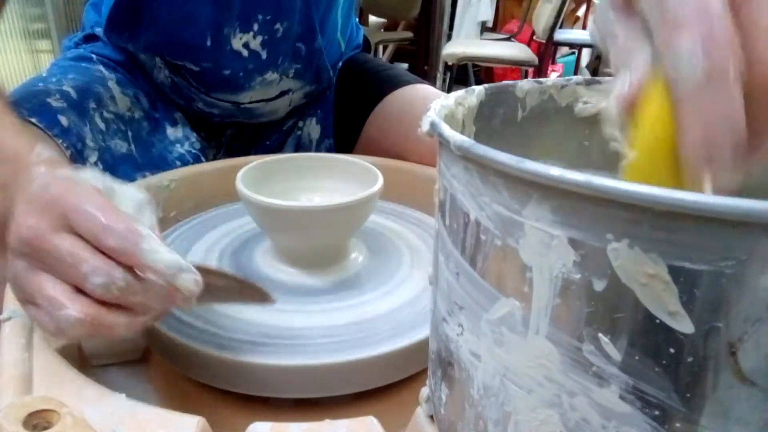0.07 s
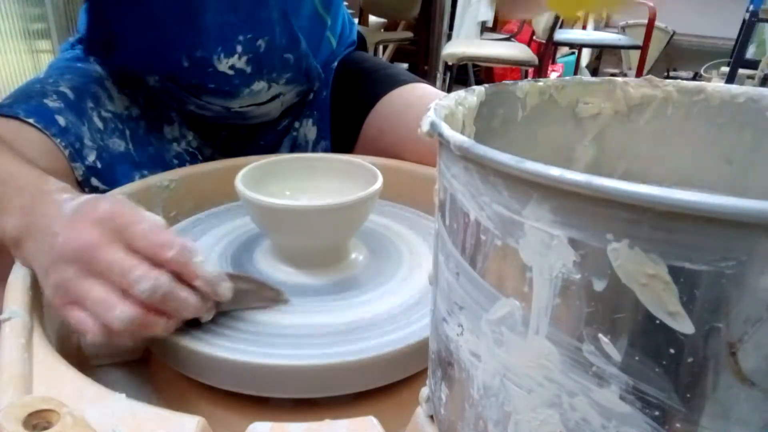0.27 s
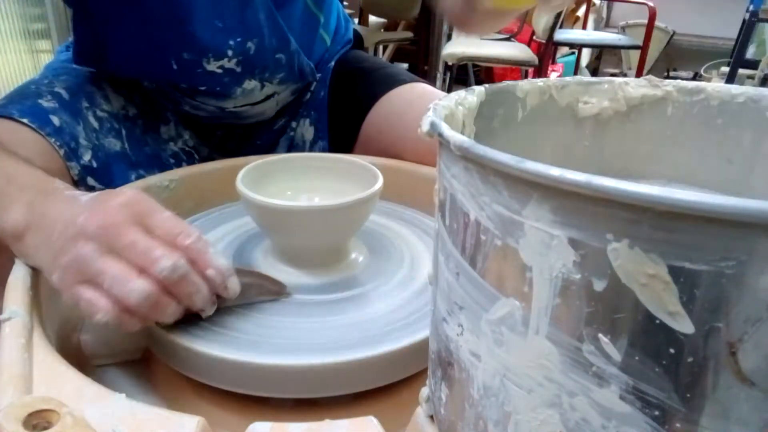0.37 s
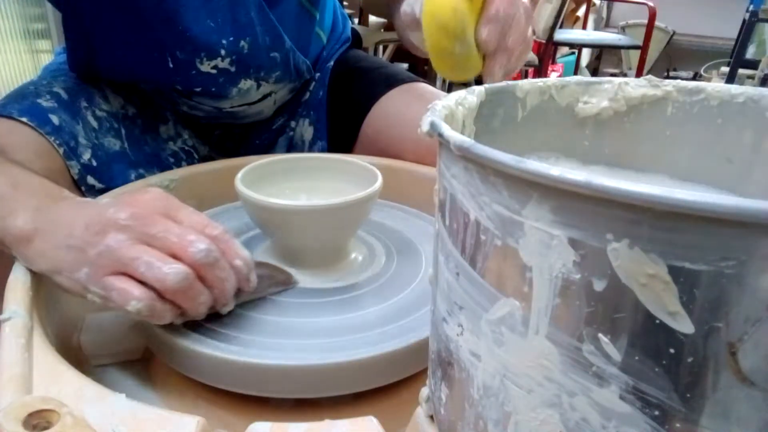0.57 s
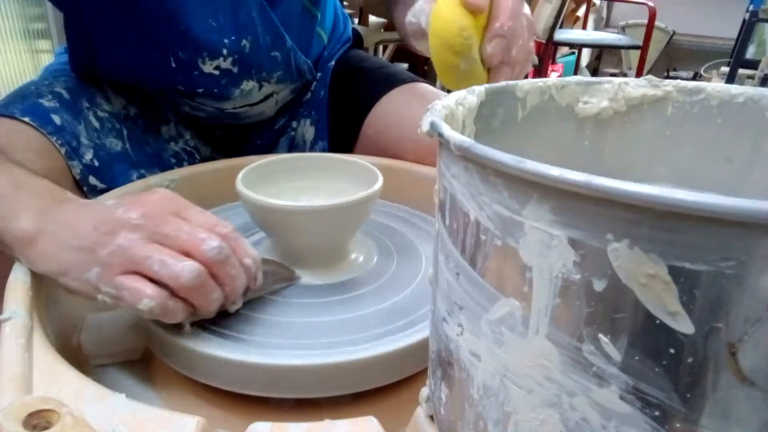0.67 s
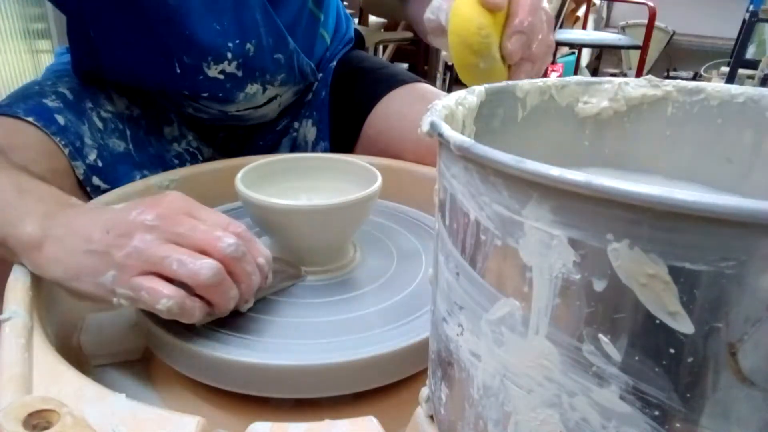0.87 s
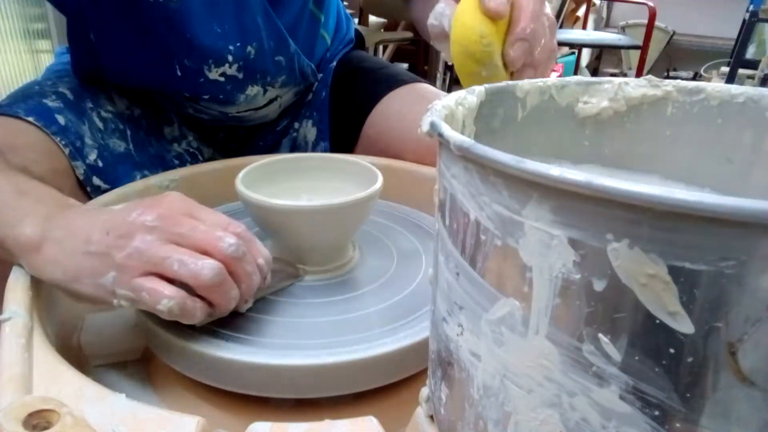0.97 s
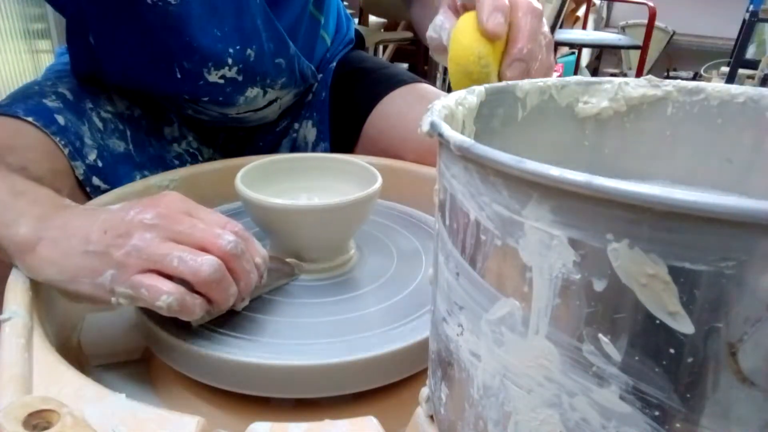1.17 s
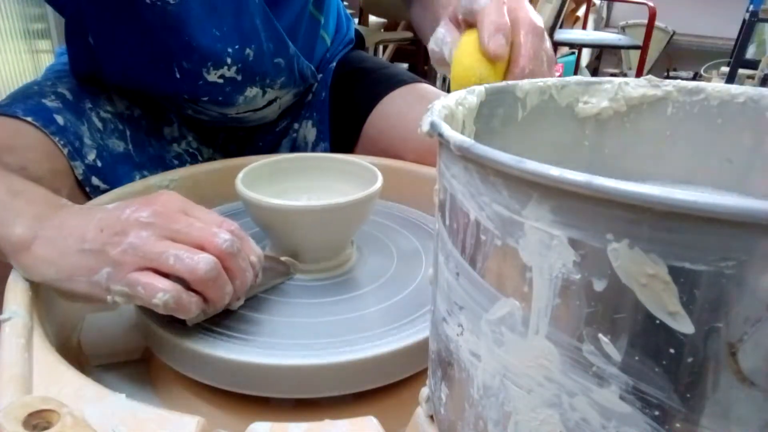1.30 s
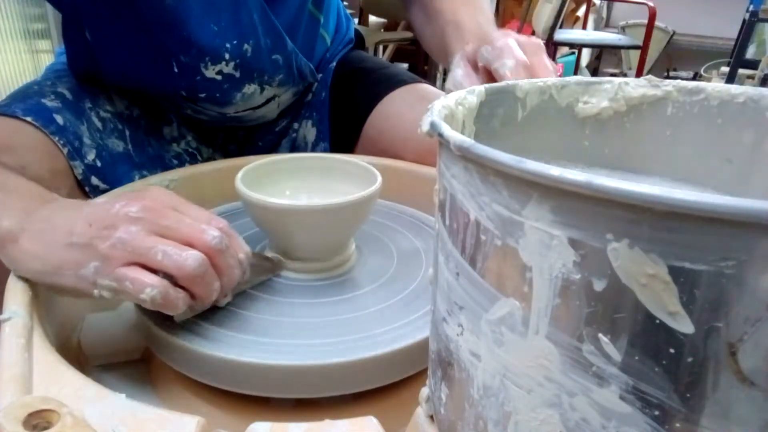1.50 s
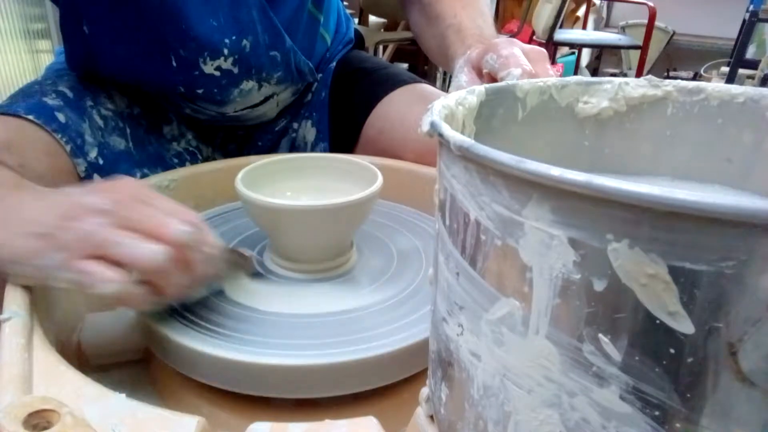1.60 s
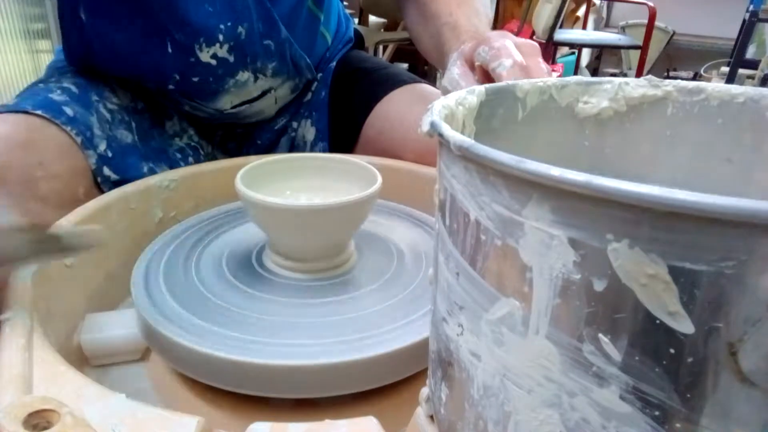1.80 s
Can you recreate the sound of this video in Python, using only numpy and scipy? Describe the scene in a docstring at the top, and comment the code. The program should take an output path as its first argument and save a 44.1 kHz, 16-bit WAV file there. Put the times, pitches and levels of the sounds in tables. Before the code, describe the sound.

A gritty, hissing scrape of a wooden tool on a turning potter's wheel, heard up close in a studio. It squeaks early and again near the end, after a distant knock, leaving a short metallic ring. The motor hums faintly.

```python
"""In a pottery studio, close by, a wooden tool scrapes wet clay off the head of a spinning wheel.
Sliding friction on grit makes a hiss. Where the blade meets bare metal it squeals by stick-slip and
drives the head's normal modes, which ring on after the tool lifts. Further off, something is put down
with a dull knock. The wheel's motor hums throughout."""
import sys
import numpy as np
from scipy.fft import rfft, irfft, next_fast_len
from scipy.io import wavfile
from scipy.ndimage import uniform_filter1d, map_coordinates

SR = 44100
rng = np.random.default_rng(int(sys.argv[2]) if len(sys.argv) > 2 else 0)


def file_out(sig):
    """Save sig as 16-bit WAV at sys.argv[1]."""
    # one column per channel
    cols = np.atleast_2d(sig).T
    # limit, then scale
    lim = np.clip(cols, -1, 1)
    pcm = np.round(lim * 32767).astype(np.int16)
    wavfile.write(sys.argv[1], SR, pcm)


N = 81585
TIME = np.arange(N) / SR

# correlation between the ears (f/Hz, coefficient)
COHERENCE = [(60, 0.8), (250, 0.6), (1000, 0.41), (2500, 0.19), (6000, 0.08), (15000, 0.033)]
# spectra of the room air, the drive's rumble and the running wheel (f/Hz, gain/dB)
AIR_SPECTRUM = [(59, -27), (100, 0), (140, -7.5), (188, -3), (228, -11), (477, -10.5), (530, -15),
                (917, -14), (1160, -22.5), (3180, -20), (3460, -20.5), (6660, -28), (8410, -37),
                (15500, -38.5)]
RUMBLE_SPECTRUM = [(20, -5), (35, -13), (50, 3), (85, 0.5), (120, -14), (250, -39), (1000, -70)]
WHEEL_SPECTRUM = [(1500, -19), (2600, -15), (3100, 0), (3700, -2), (4300, -15), (6500, -6.5), (9000, -21),
                  (15000, -18)]
# envelopes of the motor's hum and the wheel's hiss (t/s, relative level/dB)
HUM_ENVELOPE = [(0.0, -65), (0.35, -53), (0.458, -78), (0.694, -81), (0.73, -70), (1.154, -51.5),
                (1.2, -73), (1.236, -57), (1.36, -87), (1.432, -54), (1.596, -50.5), (1.658, -88),
                (1.726, -47.5), (1.85, -59)]
WHEEL_ENVELOPE = [(0, -73.5), (1.5, -69), (1.7, -66), (1.85, -65)]
# motor overtones (f/Hz, level/dB)
OVERTONES = [(116, -85), (182, -81)]
# impacts of the knock (t/s, clack level/dB, clack T60/s)
IMPACTS = [(1.1463, -30.5, .09), (1.159, -36, 0.088), (1.177, -43.5, 0.31)]
# spectra of the knock's bright and dull parts (f/Hz, gain/dB)
CLACK_SPECTRUM = [(100, -16), (500, -9), (900, 0.5), (1200, -4.5), (1600, -5), (2800, 0.5), (3500, 8),
                  (4300, 0), (6000, -30), (14000, -35)]
THUD_SPECTRUM = [(30, -20), (80, 14.5), (120, -12), (190, 7.5), (320, 5), (450, -3), (700, 4), (1500, -2),
                 (4000, -18)]
# squeals of the blade (t/s, duration/s, f/Hz, glide/(Hz/s), jitter/Hz, level/dB)
STICK_SLIPS = [(.33, 0.087, 1740, -1, 110, -45.5), (0.28, 0.26, 5780, -4, 100, -46),
               (0.43, 0.14, 5720, -1500, 55, -43.5), (1.36, 0.039, 1800, -1, 25.3, -42.5),
               (1.41, 0.041, 1795, 1, 40.2, -47.5), (1.37, 0.093, 2940, 0.5, 51.8, -45)]
# drive of the blade on bare metal (t/s, level/dB)
DRIVE_ENVELOPE = [(.125, -97), (.16, -60.5), (.23, -53.5), (.35, -51.5), (.43, -49.5), (.52, -54.5),
                  (.62, -59.5), (.95, -58), (1.1, -63), (1.28, -59.5), (1.38, -54), (1.44, -53),
                  (1.485, -52.5), (1.53, -61.5), (1.6, -82)]
# low drag of the blade on the head (f/Hz, gain/dB)
DRAG_SPECTRUM = [(30, -15), (70, -7), (200, -5), (450, -9.5), (1200, 0.5), (3000, -44)]
# head modes, damped by hand and clay (f/Hz, width/Hz, gain far out/dB, gain at the pot's foot/dB)
HEAD_MODES = [(628.5, 33, -12.5, -19.5), (878.5, 31.5, -6.5, -1.5), (918, 17.6, -1, -3),
              (1388, 52, -18, -3), (1787, 26.3, -3.5, 0.5), (2918, 26, 1.5, 4), (3052, 22, 3, -28),
              (3310, 26, -1.5, -4), (3534, 17, -31, 3.5), (4220, 39, -8.5, 2.5), (4674, 44, -19, 6),
              (4970, 41, -3, 5.5), (5785, 82, -20, 6.5), (6570, 50, -12, -22)]
# modes ringing freely as the blade lifts (f/Hz, level/dB, T60/s)
FREE_MODES = [(3047, -66, 0.13), (3330, -53, .12), (4750, -55, .11), (4920, -49, 0.17)]
# a low mode singing clean as the hand eases off (t/s, f/Hz, level/dB)
SINGING_MODE = [(1.27, 880.5, -77), (1.34, 880, -61), (1.44, 882, -52.5), (1.511, 922, -47),
                (1.55, 928, -57.5), (1.68, 931, -65), (1.85, 937, -87)]
# envelopes of the blade's hiss and rasp on clay (t/s, relative level/dB)
HISS_ENVELOPE = [(0.14, -81), (0.148, -62.5), (0.35, -37.5), (0.398, -43), (0.406, -36.5), (0.518, -40.5),
                 (0.564, -37.5), (0.666, -36.5), (0.68, -33.5), (0.77, -38), (0.824, -36), (1.038, -36),
                 (1.264, -40), (1.434, -36.5), (1.45, -43), (1.466, -38.5), (1.62, -76)]
RASP_ENVELOPE = [(.14, -85), (.24, -64), (.34, -59), (.52, -56), (.7, -52.5), (.78, -57), (1.0, -57.5),
                 (1.13, -55.5), (1.3, -55), (1.42, -57), (1.49, -63.5), (1.55, -84)]
# coarse grit catching under the blade (t/s, level/dB, T60/s)
GRIT_CATCHES = [(0.146, -50, 0.048), (.291, -35, .06), (0.405, -33, .08), (0.565, -42, 0.011),
                (.681, -39, .03), (.733, -35, .012)]
# spectra of the scrape's three bands (f/Hz, gain/dB)
RASP_SPECTRUM = [(100, -18), (500, -22.5), (1050, -15.5), (1400, -2), (2450, 2.5), (2740, -0.5), (2950, -5),
                 (4500, -2), (9000, -39)]
HISS_SPECTRUM = [(300, -68), (1200, -19), (2500, -12), (2750, -11), (2950, -3), (3800, -6), (4450, -9),
                 (4750, -5), (5650, 0.5), (7000, -4), (8000, -10), (10000, -11), (13500, -17), (14300, -9),
                 (15500, -10.5)]
FIZZ_SPECTRUM = [(9000, -43), (13800, -15), (14700, -6.5), (15300, 2), (15600, -6.5)]
# reflections off the splash pan and the bucket (delay/s, gain/dB)
ECHOES = [(.0019, -26), (.0034, -11), (.0057, -13), (.0083, -16.5), (0.0126, -14.5), (.019, -17.5)]
# level difference of the tool's sound between the ears (f/Hz, left minus right/dB)
BALANCE = [(200, 5), (770, 3), (1170, -0.5), (1790, 3.5), (2740, -2.5), (4190, -3.5), (6410, -8.5),
           (9810, 0), (15000, 0.5)]


def amp(db):
    """Amplitude ratio of a level in decibels."""
    return 10 ** (np.asarray(db) / 20)


def along(points, hz):
    """Interpolation of (f/Hz, value) points on a logarithmic frequency axis."""
    f, values = np.transpose(points)
    return np.interp(np.log(hz + 1), np.log(f + 1), values)


def envelope(points):
    """Linear interpolation of (t/s, level/dB) points, silent outside them."""
    return np.interp(TIME, *np.transpose(points), left=-120, right=-120)


def wobble(rate):
    """Smooth random modulation: a spline through rate Gaussian knots a second."""
    return map_coordinates(rng.standard_normal(N // 8), [np.arange(N) * rate / SR + 2])


def flutter(rate):
    """Random modulation held within +-1 by soft saturation."""
    return np.tanh(wobble(rate))


def strike(start, t60, attack_s):
    """Envelope of a damped vibration: a quick rise, then exponential decay."""
    age = np.maximum(TIME - start, 0)
    return (1 - np.exp(-age / attack_s)) * np.exp(-np.log(1000) * age / t60)


def filtered(x, response):
    """Linear filtering: the spectrum of x times a frequency response."""
    size = next_fast_len(N + SR // 2)
    return irfft(rfft(x, size) * response(np.fft.rfftfreq(size, 1 / SR)), size)[..., :N]


def stereo_noise(response, modulation=1):
    """Partially coherent noise of rms 1, most alike at the two ears in the bass."""
    def mid_and_side(hz):
        angle = np.arccos(along(COHERENCE, hz)) / 2
        return response(hz) * np.array([np.cos(angle), np.sin(angle)])
    mid, side = filtered(modulation * rng.standard_normal((2, N)), mid_and_side)
    pair = np.array([mid + side, mid - side])
    return pair / np.sqrt(np.mean(pair ** 2) + 1e-20)


def band(spectrum, modulation=1):
    """Spectral shaping: stereo noise of rms 1 coloured by (f/Hz, gain/dB) points."""
    return stereo_noise(lambda hz: amp(along(spectrum, hz)), modulation)


def resonance(hz, width):
    """Resonance under random forcing: noise through two like second-order band-passes."""
    return stereo_noise(lambda f: (2j * f * width / (hz ** 2 - f ** 2 + 2j * f * width)) ** 2)


def room_air(level_db=-63.5, low_cut_hz=110):
    """Ambient noise: stationary and broadband, with the deep bass rolled off."""
    high_pass = lambda hz: hz ** 2 / (hz ** 2 + low_cut_hz ** 2)
    return amp(level_db) * stereo_noise(lambda hz: amp(along(AIR_SPECTRUM, hz)) * high_pass(hz))


def motor(hum_hz=58.6, drift=0.049, rumble_db=-65.5):
    """Machine vibration: a hum modulated in frequency and level, faint overtones and a rumble."""
    phase = 2 * np.pi * np.cumsum(hum_hz * (1 + drift * wobble(11.47))) / SR
    hum = amp(envelope(HUM_ENVELOPE) - 5.5) * np.sin(phase)
    for hz, db in OVERTONES:
        hum += amp(db + 1.2 * wobble(8)) * np.sin(2 * np.pi * hz * TIME + 0.49 * wobble(6.6))
    return np.sqrt(2) * hum + amp(rumble_db) * band(RUMBLE_SPECTRUM)


def running_wheel():
    """Running noise: the turning wheel gives a soft hiss that slowly grows."""
    return amp(envelope(WHEEL_ENVELOPE)) * band(WHEEL_SPECTRUM)


def knock(thud_gain_db=-16, thud_t60=0.4):
    """Impact excitation: an object set down gives a short clack and a thud that hangs in the room."""
    clack = sum(amp(db) * strike(start, t60, attack_s=0.00077) for start, db, t60 in IMPACTS)
    thud = sum(amp(db) * strike(start, thud_t60, attack_s=0.0075) for start, db, _ in IMPACTS)
    return clack * band(CLACK_SPECTRUM) + amp(thud_gain_db) * thud * band(THUD_SPECTRUM)


def squeals(rough_db=3):
    """Stick-slip oscillation: the blade gives brief tones that swell and fade with a ragged pitch."""
    out = np.zeros(N)
    for start, duration, hz, glide, jitter, db in STICK_SLIPS:
        age = TIME - start
        swell = np.sqrt(np.abs(np.sin(np.pi * np.clip(age / duration, 0, 1))))
        pitch = hz + glide * age + jitter * wobble(400)
        out += amp(db + rough_db * wobble(120)) * swell * np.sin(2 * np.pi * np.cumsum(pitch) / SR)
    return out


def driven_head(inward_s=(0.39, 0.69), drag_gain_db=-13, chatter_db=2):
    """Forced vibration: friction drives each mode of the head according to the point of contact."""
    drive_db = envelope(DRIVE_ENVELOPE)
    inward = np.interp(TIME, inward_s, [0, 1])  # the blade travels from far out to the pot's foot
    out = amp(drive_db + drag_gain_db) * band(DRAG_SPECTRUM)
    for hz, width, outer_db, inner_db in HEAD_MODES:
        coupling_db = outer_db + inward * (inner_db - outer_db)
        out += resonance(hz, width) * amp(drive_db + coupling_db + chatter_db * flutter(25.36))
    return out


def ringing_head(lift_s=1.48, waver_db=2):
    """Free vibration: as the blade leaves, high modes decay and a low one sings on as a pure tone."""
    ring = sum(amp(db) * strike(lift_s, t60, attack_s=0.006) * resonance(hz, width=21)
               for hz, db, t60 in FREE_MODES)
    times, pitches, levels = np.transpose(SINGING_MODE)
    level_db = envelope(np.column_stack([times, levels])) + waver_db * flutter(35.2)
    phase = 2 * np.pi * np.cumsum(np.interp(TIME, times, pitches)) / SR
    return ring + np.sqrt(2) * amp(level_db) * np.sin(phase)


def reflections(x):
    """Comb filtering: nearby hard surfaces add faint copies, each slightly later at the left ear."""
    path_ratio = np.array([[1.02], [0.98]])
    comb = lambda hz: 1 + sum(amp(db) * np.exp(-2j * np.pi * hz * s * path_ratio) for s, db in ECHOES)
    return filtered(x, comb)


def grit(slips_per_s=8000, spread_db=3, smooth_share=0.58):
    """Shot-noise envelope: tiny random slips of uneven size add in power to a smooth rub."""
    occurs = rng.random(N) < slips_per_s / SR
    slips = occurs * amp(spread_db * np.minimum(rng.standard_normal(N), 2.5))
    power = np.abs(uniform_filter1d(slips ** 2, size=14))
    return np.sqrt(smooth_share + (1 - smooth_share) * power / power.mean())


def scrape(fizz_gain_db=-2.5, drying_s=(0.71, 1.7), drying_db=-7, firm_db=-49):
    """Friction noise: the same grains under the blade modulate a hiss, a lower rasp and a fine fizz."""
    grains = grit() * amp(1.4 * flutter(130))
    stroke_db = envelope(HISS_ENVELOPE)
    catches = sum(amp(db) * strike(start, t60, attack_s=0.00067) for start, db, t60 in GRIT_CATCHES)
    hiss = np.hypot(amp(stroke_db), catches) * band(HISS_SPECTRUM, grains)
    rasp = amp(envelope(RASP_ENVELOPE) + 4 + 2 * flutter(59.96)) * band(RASP_SPECTRUM, grains)
    wet_db = np.interp(TIME, drying_s, [0, drying_db])  # the fizz fades as wet clay is scraped away
    skim_loss_db = np.maximum(0, firm_db - stroke_db) / 2  # a skimming blade fizzes less
    fizz_db = stroke_db + fizz_gain_db + wet_db - skim_loss_db + flutter(200)
    return hiss + rasp + amp(fizz_db) * band(FIZZ_SPECTRUM, grains)


def scene():
    """Superposition: the tool, its treble a little to the right, over air, motor, wheel and knock."""
    tool = reflections(scrape()) + driven_head() + ringing_head() + squeals()
    tool = filtered(tool, lambda hz: amp(along(BALANCE, hz) * np.array([[0.5], [-0.5]])))
    return room_air() + motor() + running_wheel() + knock() + tool


def record(dry):
    """Band limiting: an ideal low-pass filter removes the highest treble."""
    return filtered(dry, lambda hz: hz < 15550)


dry = scene()
out = record(dry)
file_out(out)
```